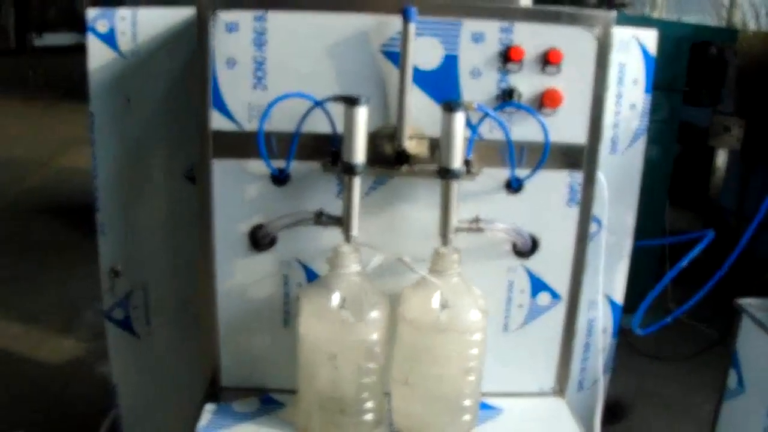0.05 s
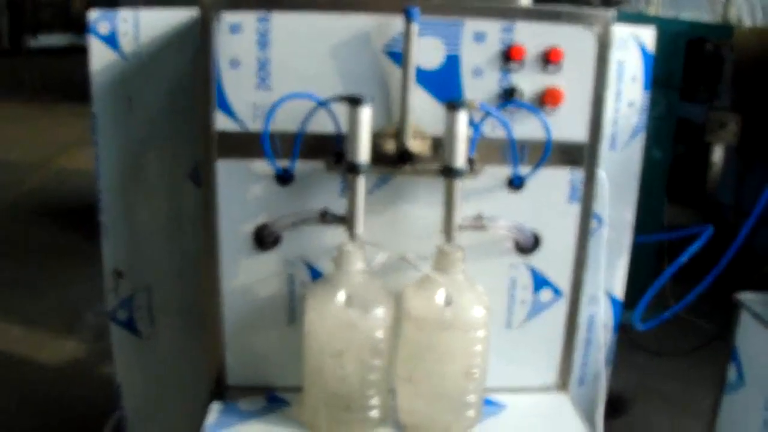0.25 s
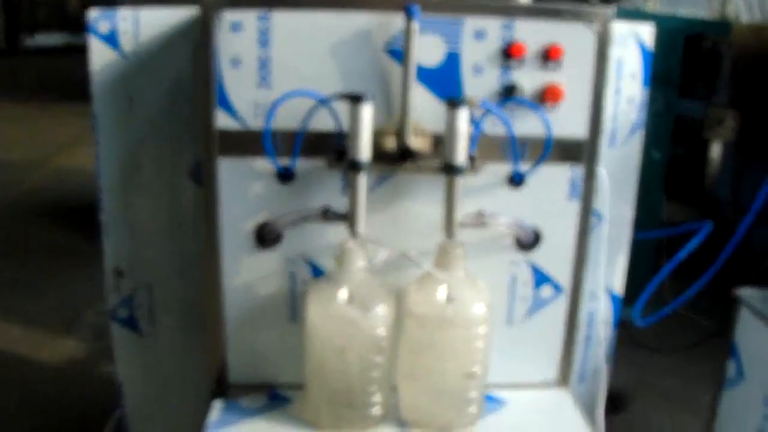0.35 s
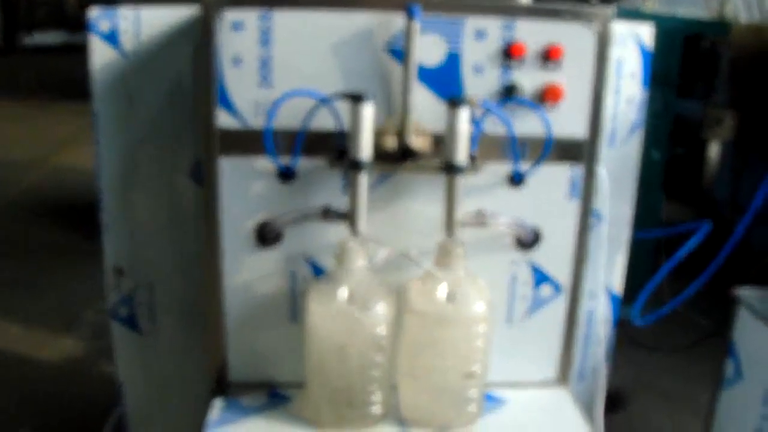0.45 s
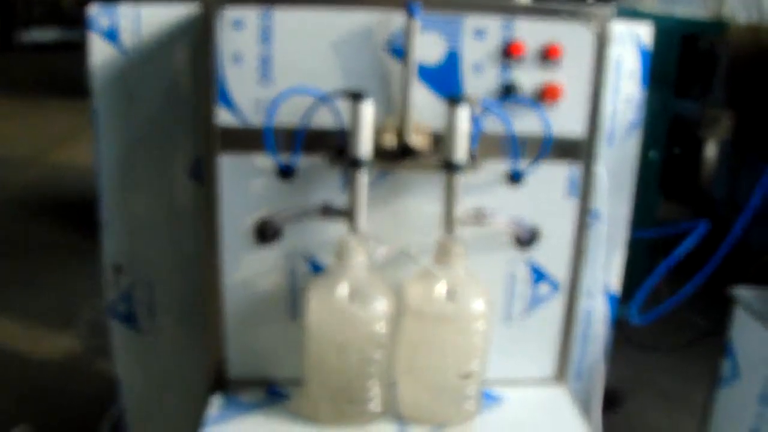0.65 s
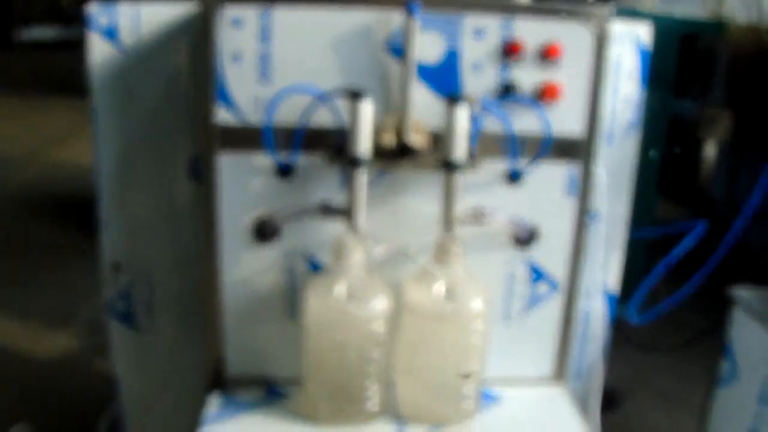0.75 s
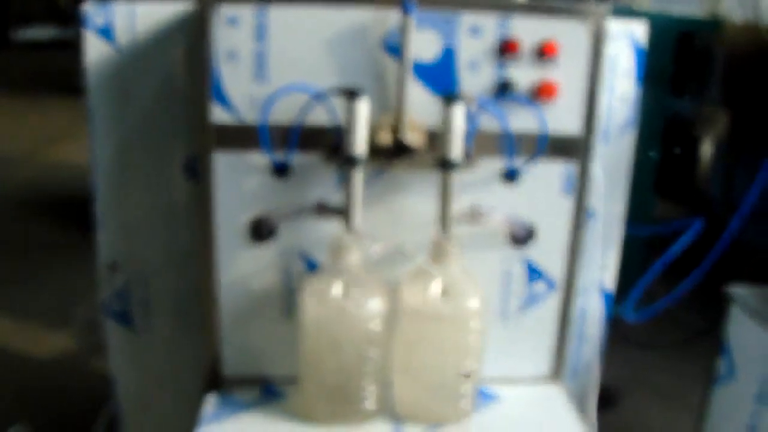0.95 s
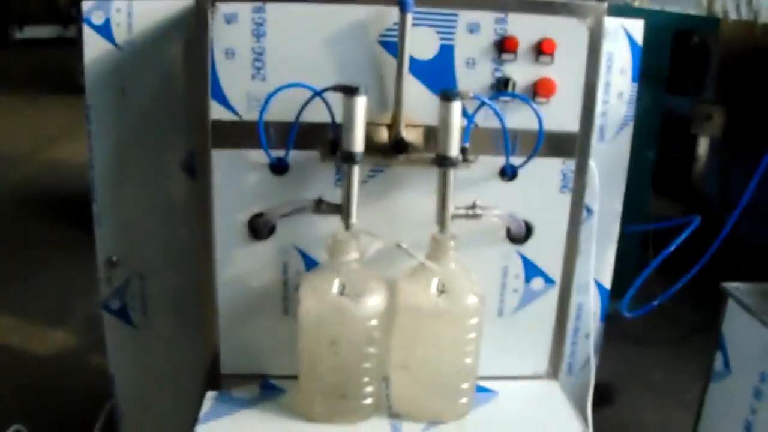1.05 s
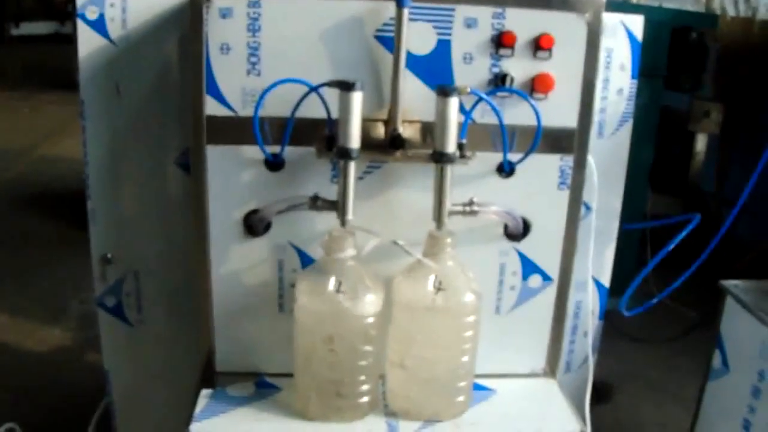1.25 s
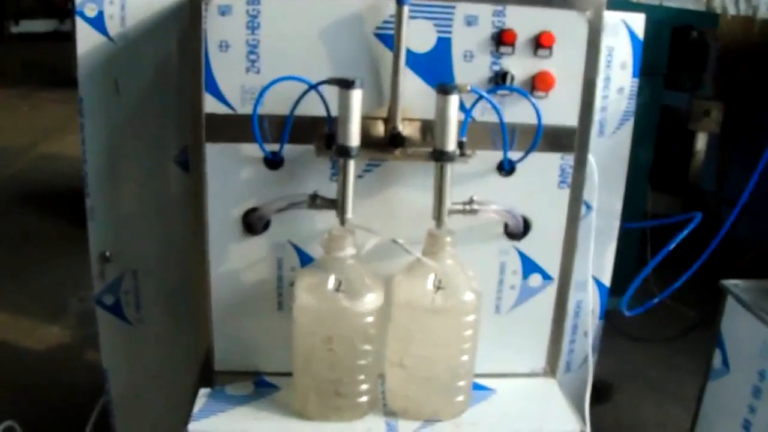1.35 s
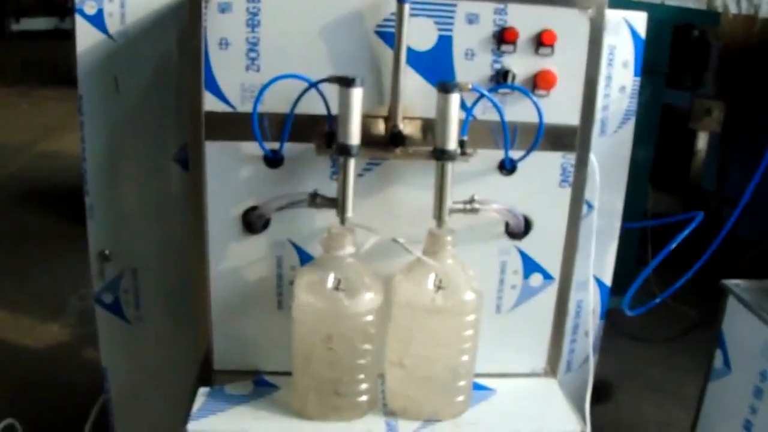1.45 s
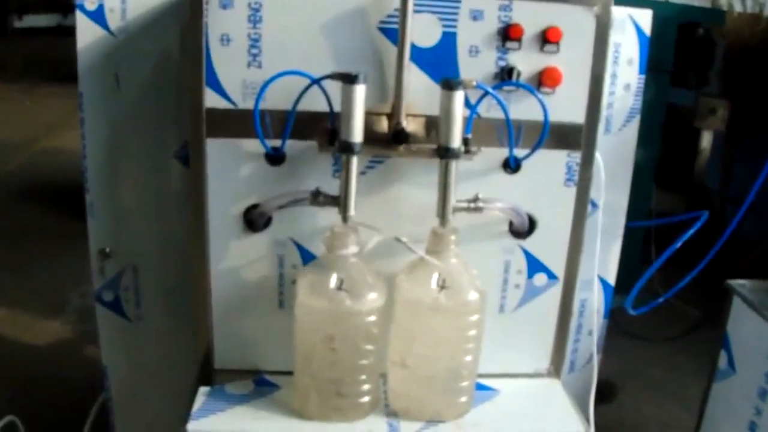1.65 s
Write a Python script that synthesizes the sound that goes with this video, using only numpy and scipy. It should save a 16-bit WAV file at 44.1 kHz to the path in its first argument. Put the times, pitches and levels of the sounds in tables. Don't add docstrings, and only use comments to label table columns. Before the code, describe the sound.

Pneumatic filler rushes with air, then spits two sharp exhaust hisses with valve clacks and echo

```python
import sys
import numpy as np
from scipy import signal
from scipy.fft import rfft, irfft
from scipy.io import wavfile
from scipy.ndimage import uniform_filter1d

SR = 44100
rng = np.random.default_rng(int(sys.argv[2]) if len(sys.argv) > 2 else 0)


def gain_from_db(level_db):
    decades = np.asarray(level_db, float) / 20
    return 10 ** decades


def pcm_store(signal):
    levels = np.round(np.clip(np.atleast_2d(signal), -1, 1) * 32767)
    wavfile.write(sys.argv[1], SR, levels.astype(np.int16).T)


N = 74970
GAIN_DROPS_S = 0.191


def level(x, db):
    return x * gain_from_db(db) / np.sqrt(np.mean(x ** 2))


def walk(rate_hz):
    hold = max(int(SR / rate_hz), 2)
    steps = np.repeat(rng.standard_normal(N // 2 + 1)[:N // hold + 1], hold)
    smooth = uniform_filter1d(uniform_filter1d(steps, hold), hold)
    return 1.22 * smooth[:N]


def hiss(colour, peaks=(), flicker_db=0., flicker_hz=10.):
    hz = np.arange(N // 2 + 1) * SR / N + 1
    colour_hz, colour_db = np.array(colour, float).T
    power = gain_from_db(np.interp(np.log(hz), np.log(colour_hz), colour_db)) ** 2
    power = power * (hz > .7 * colour_hz[0])
    boost = 1
    for centre, width, db in peaks:
        boost = boost + 4 * gain_from_db(db) ** 2 / (1 + (2 * (hz - centre) / width) ** 2)
    spectrum = rfft(rng.standard_normal(N)) * np.sqrt(power * boost)
    octave = np.log2(hz / 30)
    total = 0
    for k in range(11):
        band = irfft(spectrum * np.clip(1 - abs(octave - k), 0, 1), N)
        total = total + band * gain_from_db(flicker_db * walk(flicker_hz))
    return level(total, 0)


def puff(start_s, rise_s, hold_s, t60_s):
    t = np.arange(N) / SR - start_s
    rise = np.sin(np.pi / 2 * np.clip(t / rise_s, 0, 1)) ** 2
    return rise * gain_from_db(-60 * np.maximum(t - rise_s - hold_s, 0) / t60_s)


def ring(start_s, hz, t60_s):
    t = np.maximum(np.arange(N) / SR - start_s, 0)
    return np.sin(2 * np.pi * hz * t) * gain_from_db(-60 * t / t60_s) * (1 - np.exp(-t / 0.0023))


# pitch in Hz, level in dB per Hz.
SHOP_COLOUR = [(15, -30), (25, -7), (145, -8), (168, -6), (252, -5), (479, -16), (630, -16), (1700, -11),
               (2000, -10.5), (2600, -13), (4400, -120)]
# pitch in Hz, width in Hz, level in dB.
DRONE_PEAKS = [(163, 17, -4), (301, 41, -4), (1077, 200, -1)]


def shop_hum():
    t = np.arange(N) / SR
    db = -44.5 - 3.5 * (t - 1.5)
    db = db - 3 * (t < GAIN_DROPS_S)
    return gain_from_db(db) * hiss(SHOP_COLOUR, DRONE_PEAKS, flicker_db=1.63, flicker_hz=9.7)


# pitch in Hz, level in dB per Hz.
LEAK_COLOUR = [(880, -13), (1500, -35.5), (1710, -21.5), (2540, -6.5), (4590, -9), (6690, -2), (9480, -2),
               (10900, -16), (14200, -19)]


def leak():
    return gain_from_db(-34) * hiss(LEAK_COLOUR, flicker_db=0.27, flicker_hz=13.7)


# time in seconds, level in dB.
WHISTLE_LEVELS = [(0, -43), (.2, -41.5), (.23, -56), (.5, -51), (.65, -44.5), (.84, -41), (.87, -54),
                  (1.08, -50), (1.17, -44), (1.36, -41), (1.46, -47), (1.56, -44), (1.7, -50)]


def whistle():
    t = np.arange(N) / SR
    rest_hz, extra_hz, fall_per_s = 3172, 10250, .3305
    waver_hz, flutter_db = 14, 1.5
    hz = rest_hz + extra_hz * np.exp(-fall_per_s * t) + waver_hz * walk(60)
    db = np.interp(t, *np.array(WHISTLE_LEVELS, float).T) + flutter_db * walk(25)
    return gain_from_db(db) * np.sqrt(2) * np.sin(2 * np.pi * np.cumsum(hz) / SR)


# pitch in Hz, width in Hz, level in dB.
HOSE_PEAKS = [(977, 100, 8.5), (1150, 180, 4.5), (1320, 220, 1.5), (2540, 130, 2.5), (2730, 200, -4),
              (3640, 500, -8.5), (6450, 240, 3.5), (9800, 460, -3.5)]


def inflow():
    stops_s = .2
    colour = [(750, -23), (1500, -18.5), (3000, -12), (5800, -19.5), (8500, -16), (11000, -15), (14000, -28)]
    air = hiss(colour, HOSE_PEAKS, flicker_db=0.73, flicker_hz=52)
    flow = puff(-1, 0.494, .5 + stops_s, t60_s=0.22)
    return gain_from_db(-27) * flow * air


# start in seconds, level in dB, pitch in Hz, 60 dB decay in seconds.
FRAME_KNOCKS = [(0.062, -34, 268, 0.074), (0.129, -26.5, 420, 0.059), (0.227, -20.5, 160, 0.04),
                (0.261, -35, 340, 0.1), (.405, -35, 50, 0.48), (0.45, -31, 147, 0.065),
                (.803, -22, 6350, 0.045), (.806, -27, 7200, .03), (.62, -45, 90, .2),
                (.885, -35.5, 278, 0.25), (1.134, -43, 61, 0.23)]


def knocks():
    return sum(gain_from_db(db) * ring(start_s, hz, t60_s) for start_s, db, hz, t60_s in FRAME_KNOCKS)


# pitch in Hz, level in dB, 60 dB decay in seconds.
VALVE_MODES = [(70.6, -2.5, 0.072), (160, 8, 0.043), (344, 4.5, 0.064), (517, 2.5, 0.049),
               (632.5, -0.5, .1)]


def valve_clack(start_s, shift):
    return sum(gain_from_db(db) * ring(start_s + 0.00305, hz * shift, t60_s) for hz, db, t60_s in VALVE_MODES)


# opening time in seconds, level in dB, spit in dB, bleed in dB, hold in seconds.
EXHAUSTS = [
    (0.194, -6, -2.5, -11.5, 0.0082),
    (.844, -16, 0.5, -3.5, 0.0071),
]
# pitch in Hz, width in Hz, level in dB.
SILENCER_PEAKS = [(3980, 260, -7.5), (7220, 160, 1.5), (8420, 87, 0), (8610, 67, -2), (9800, 460, -4.5),
                  (11160, 180, -2.5), (13400, 340, -6)]
# pitch factor of silencer and valve, clack level in dB, lift around 13 kHz in dB.
PITCH_SHIFTS = [1., 1.048]
CLACK_LEVELS = [-26, -33]
TOP_LIFTS = [3.5, 0]
# pitch in Hz, level in dB per Hz.
SPIT_COLOUR = [(470, -67), (800, -21), (5170, -10), (5830, -7.5), (10900, -3), (14200, -7.5)]
GUSH_COLOUR = [(180, -11), (300, -18), (1280, -26), (3110, -11), (3380, -22), (3900, -10.5), (5750, -7.5),
               (9640, -2.5), (14200, -17.5)]
BLEED_COLOUR = [(880, -39), (1500, -16), (2070, -15), (5140, -4.5), (5760, -5), (9390, 1), (14200, -13.5)]


def jets():
    out = 0
    settings = zip(EXHAUSTS, PITCH_SHIFTS, CLACK_LEVELS, TOP_LIFTS)
    for (start_s, db, spit_db, bleed_db, hold_s), shift, clack_db, lift_db in settings:
        peaks = [(hz * shift, width, peak_db) for hz, width, peak_db in SILENCER_PEAKS]
        peaks.append((13000, 4200, lift_db - 6))
        late_s, rise_s = start_s + .011, .012
        spit = gain_from_db(spit_db) * puff(start_s, 0.0094, 0.0082, t60_s=0.13) * hiss(SPIT_COLOUR)
        gush = puff(late_s, rise_s, hold_s, t60_s=.13) * hiss(GUSH_COLOUR, peaks, 0.3, 150)
        bleed = puff(late_s, rise_s, hold_s, t60_s=1.054) * hiss(BLEED_COLOUR, peaks, 0.66, 23.2)
        turbulence_db = 1.5 * walk(700)
        air = gain_from_db(db + turbulence_db) * (spit + gush + gain_from_db(bleed_db) * bleed)
        out = out + air + gain_from_db(clack_db) * valve_clack(start_s, shift)
    return out


def room(x):
    t = np.arange(SR) / SR
    noise = rng.standard_normal(SR)
    low = signal.lfilter(*signal.butter(2, 6000, fs=SR), noise)
    low_t60_s, treble_t60_s = 1, 0.52
    tail = low * gain_from_db(-60 * t / low_t60_s) + (noise - low) * gain_from_db(-60 * t / treble_t60_s)
    tail = tail * (t > .006)
    return gain_from_db(-18) * signal.fftconvolve(x, tail / np.sqrt(np.sum(tail ** 2)))[:N]


def phone_gain():
    t = np.arange(N) / SR
    settle_s = 0.016
    return gain_from_db(5.5 * np.exp(-np.maximum(t - GAIN_DROPS_S, 0) / settle_s))


def scene():
    background = phone_gain() * (shop_hum() + leak())
    near = knocks() + jets()
    mono = background + whistle() + inflow() + near + room(near)
    return np.array([mono, mono])


def top_cut(x):
    return signal.sosfilt(signal.butter(12, 14750, fs=SR, output="sos"), x)


def record(dry):
    clipped = np.clip(dry, -.95, .95)
    low_pass = signal.ellip(14, .2, 95, 14120, fs=SR, output="sos")
    finished = np.clip(signal.sosfilt(low_pass, clipped), -1, 1)
    return top_cut(finished)


dry = scene()
out = record(dry)
pcm_store(out)
```